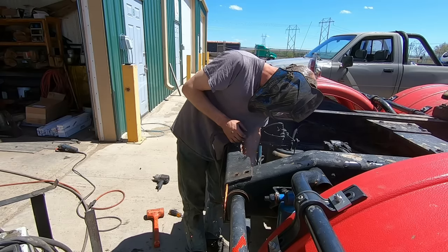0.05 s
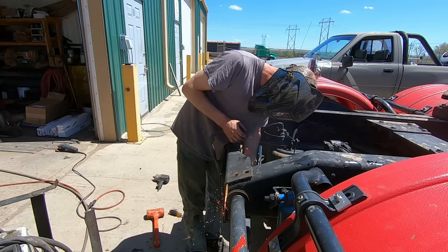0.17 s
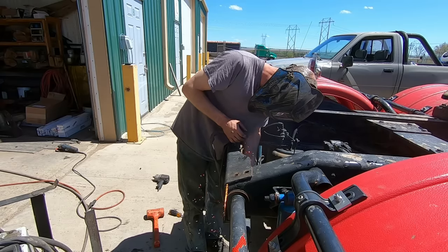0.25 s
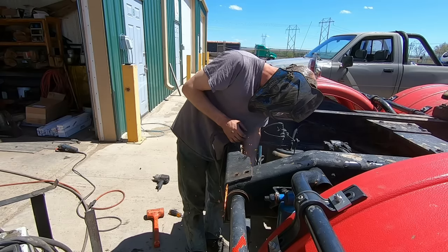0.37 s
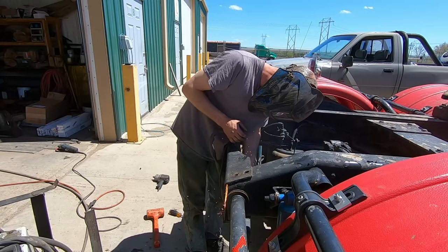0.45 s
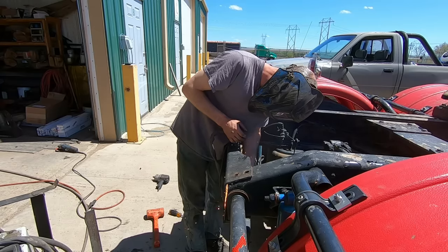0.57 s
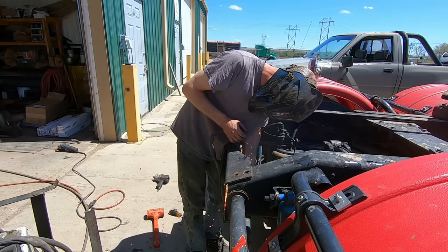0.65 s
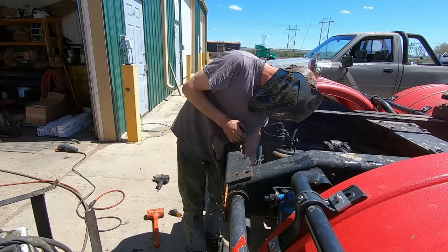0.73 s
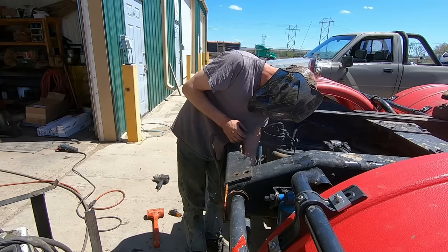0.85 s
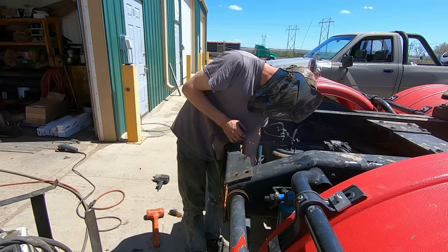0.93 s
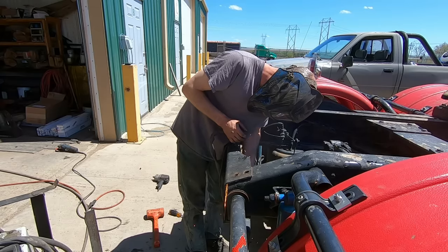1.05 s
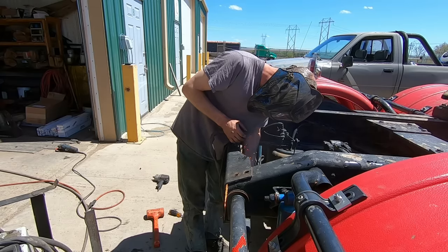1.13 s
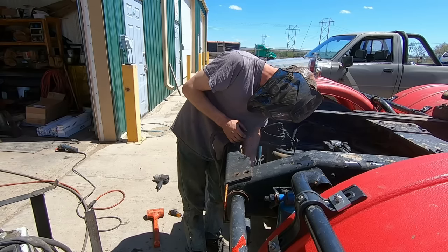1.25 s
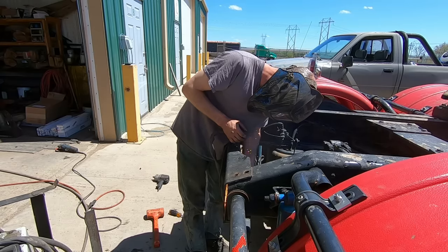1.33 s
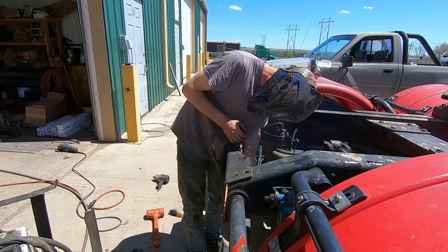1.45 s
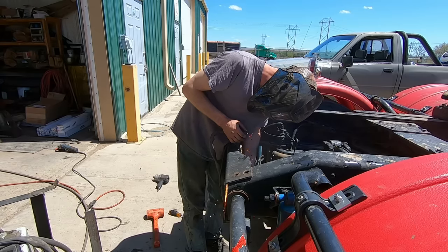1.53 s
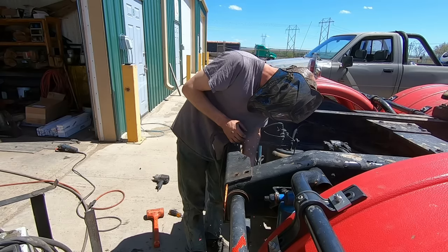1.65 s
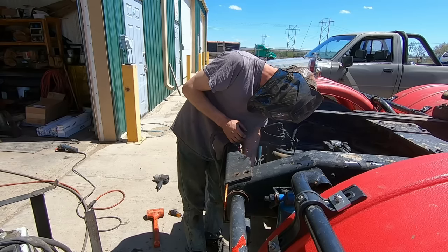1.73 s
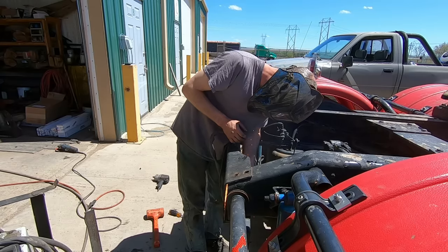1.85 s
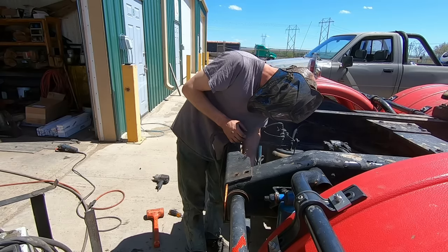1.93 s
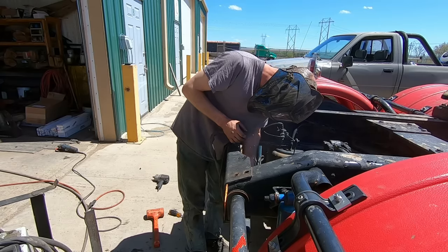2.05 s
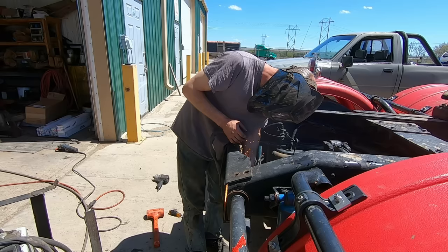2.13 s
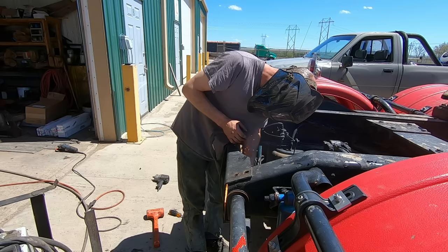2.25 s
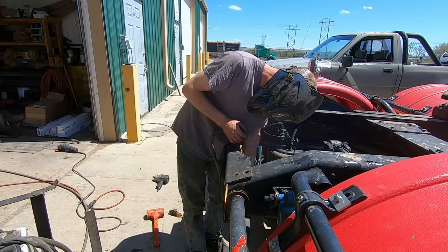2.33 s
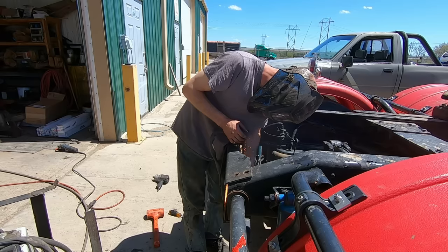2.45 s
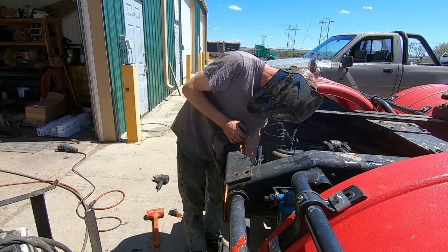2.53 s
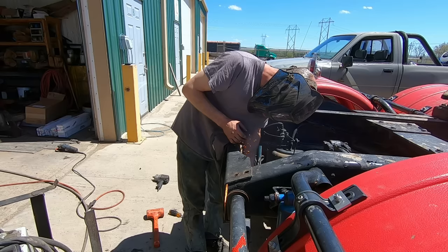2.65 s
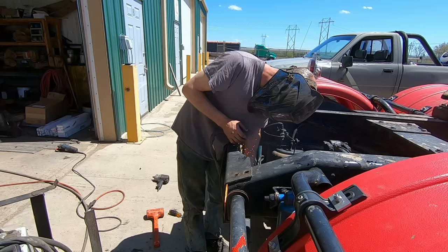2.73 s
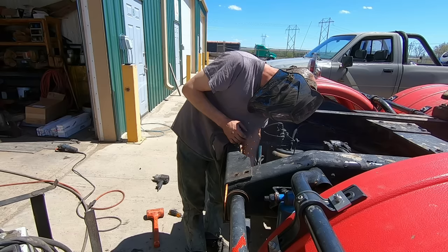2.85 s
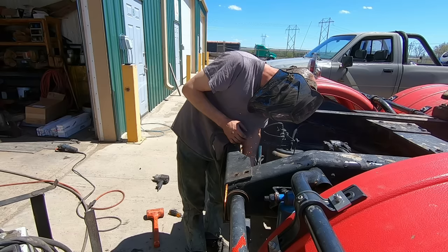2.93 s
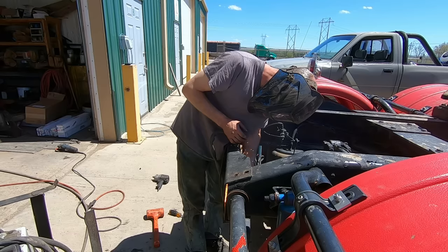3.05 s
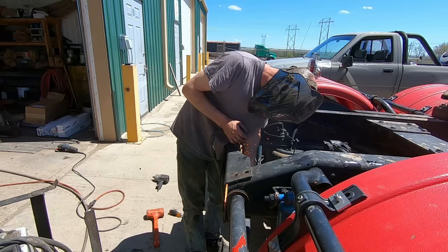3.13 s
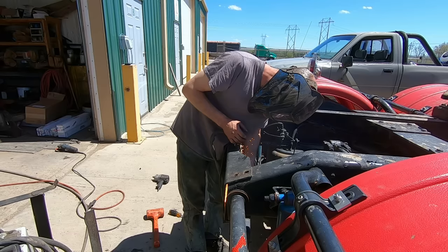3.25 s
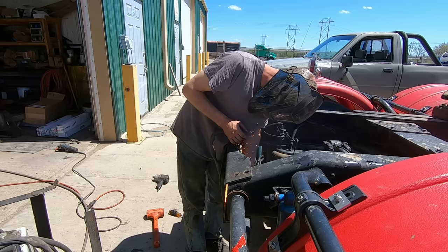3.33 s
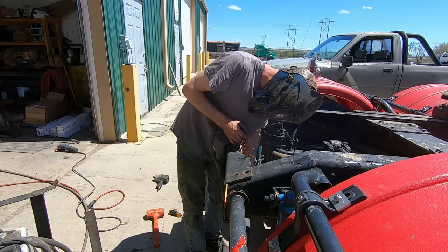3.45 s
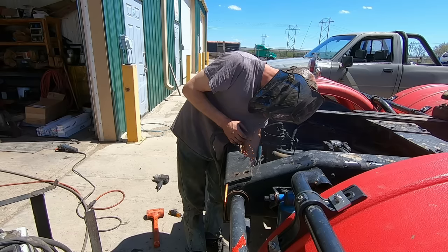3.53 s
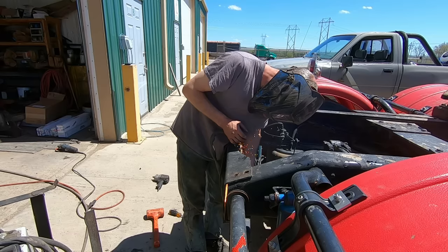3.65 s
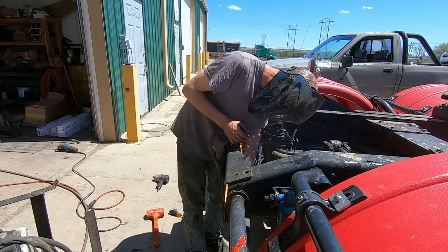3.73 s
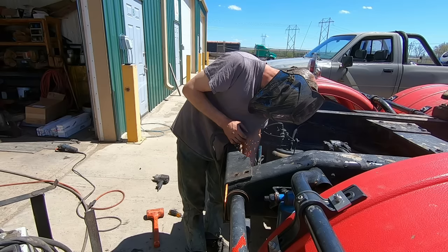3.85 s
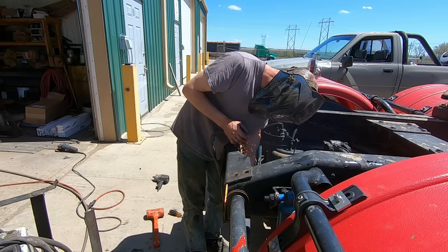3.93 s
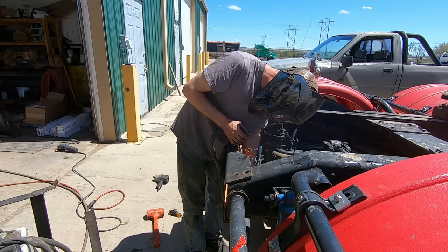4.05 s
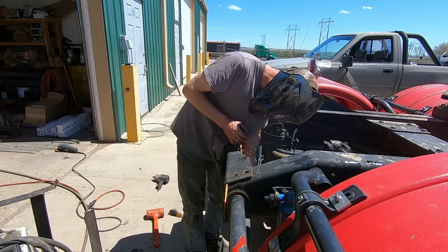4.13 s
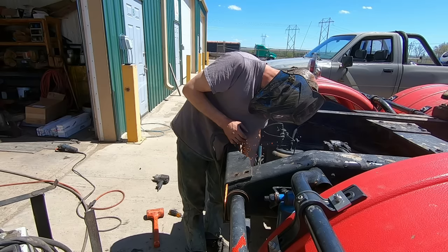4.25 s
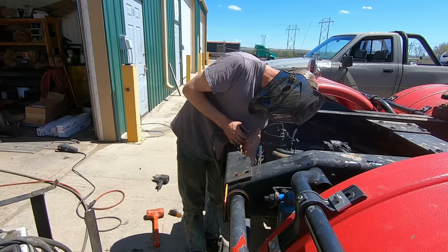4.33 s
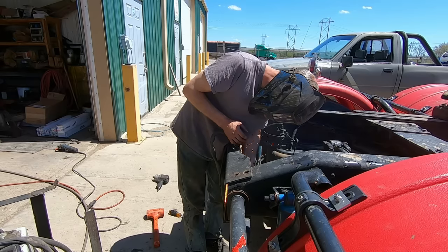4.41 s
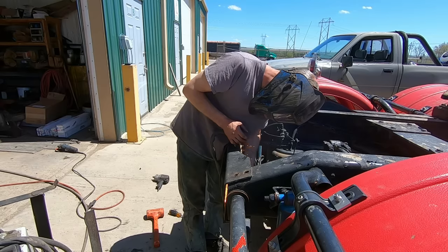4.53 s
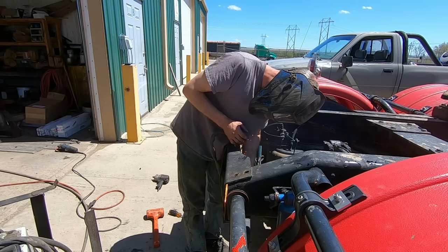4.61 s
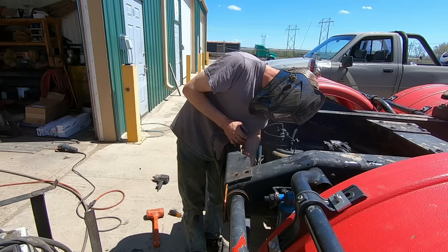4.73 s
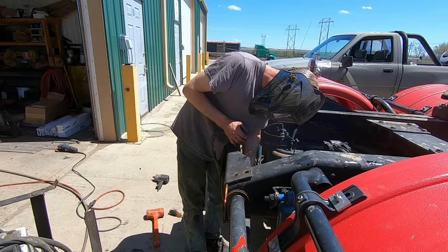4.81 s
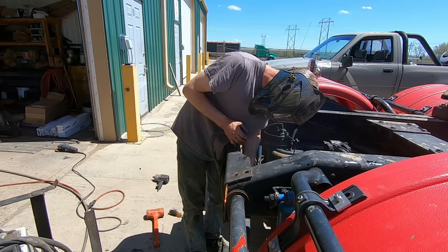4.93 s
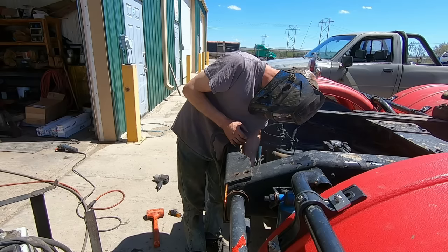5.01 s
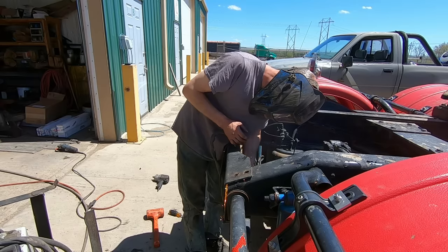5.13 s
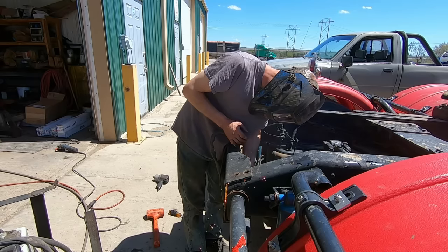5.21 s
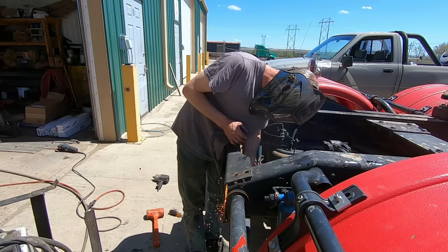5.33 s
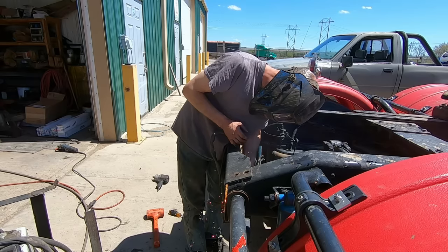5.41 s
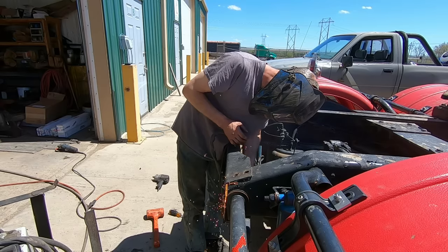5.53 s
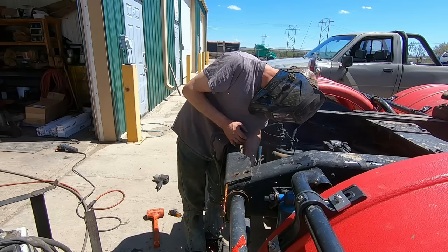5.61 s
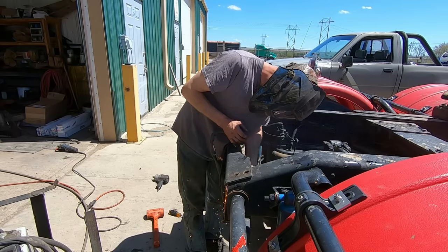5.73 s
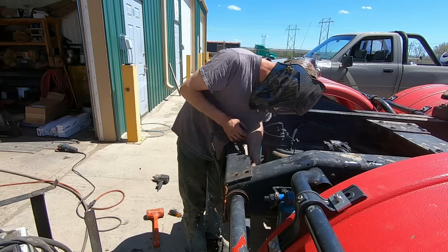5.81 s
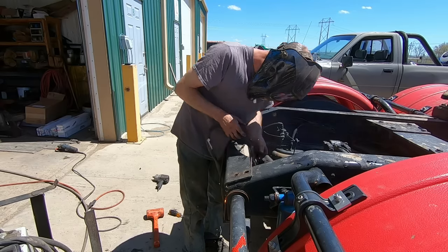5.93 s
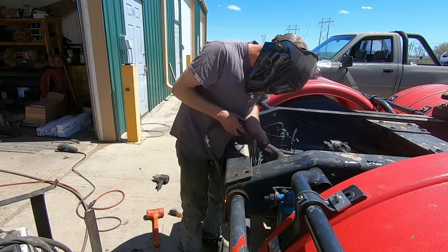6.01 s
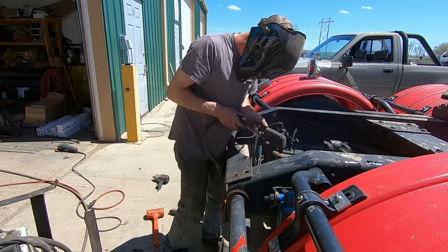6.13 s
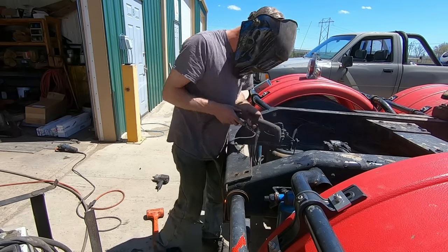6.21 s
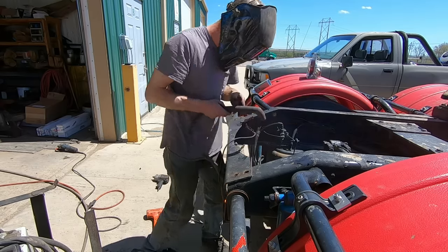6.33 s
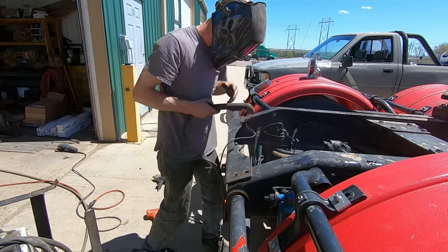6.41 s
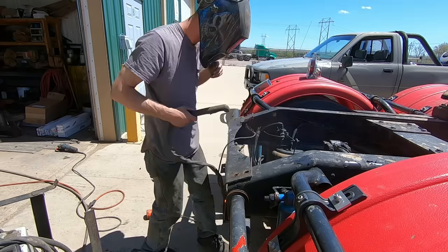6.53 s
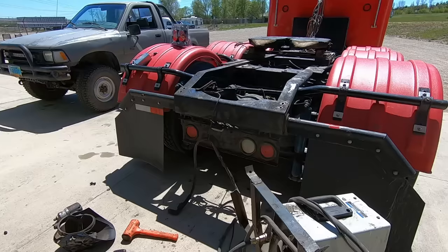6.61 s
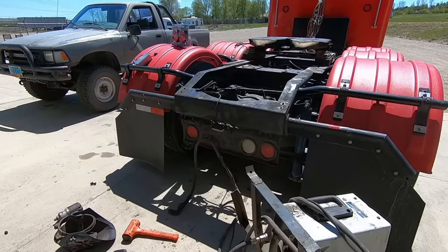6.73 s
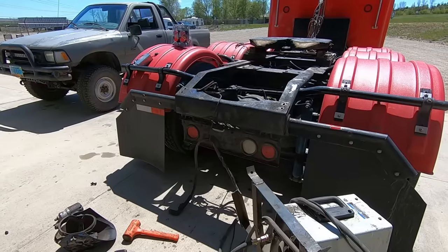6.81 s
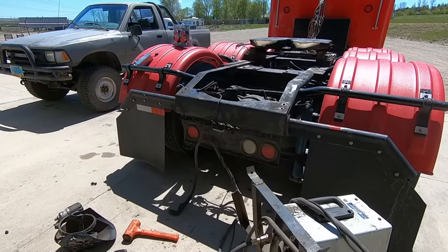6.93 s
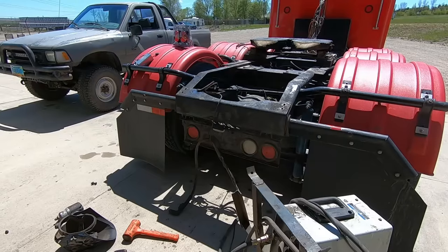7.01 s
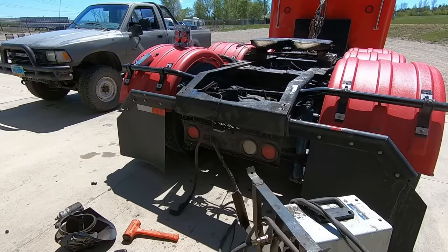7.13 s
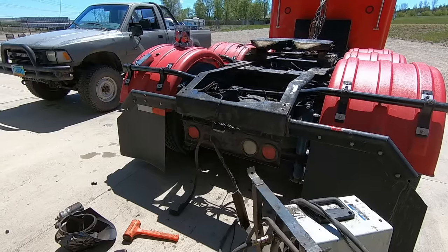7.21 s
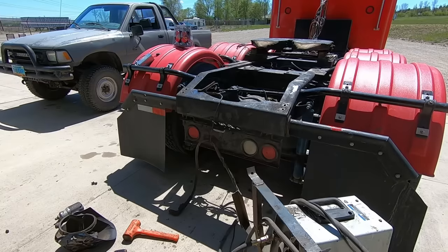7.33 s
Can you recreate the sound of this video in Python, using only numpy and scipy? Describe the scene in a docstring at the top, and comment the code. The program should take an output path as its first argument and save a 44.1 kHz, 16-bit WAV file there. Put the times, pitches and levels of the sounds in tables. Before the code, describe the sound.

Outside a workshop, a plasma torch cuts a steel truck frame with a loud, bright, slightly sputtering hiss over a low compressor hum. The arc pops off, leaving softer cooling air that grows as the torch lifts, with a fuzzy falling whistle. Everything cuts to brief silence, then low wind gusts buffet the microphone with tiny squeaks and a final scuff.

```python
"""A steady plasma-torch hiss cutting a steel truck frame, over an air compressor's hum: shaped noise and sine orders.
The arc goes out with a pop, a pressure swing plus a dull noise puff.
Cooling noise blows on, louder as the torch lifts, with a falling sine whistle of fuzzy amplitude and phase.
All sound stops briefly; then gusts of low noise buffet the microphone, with squeaks and a scuff of resonant noise."""
import sys
import numpy as np
from scipy.fft import rfft, irfft, next_fast_len
from scipy.io import wavfile
from scipy.ndimage import map_coordinates

SR = 44100
rng = np.random.default_rng(int(sys.argv[2]) if len(sys.argv) > 2 else 0)


def transcribe(u):
    """Save the signal u as a 16-bit wav file named by the first command-line argument.

    u: samples, shape (n,) or (channels, n), limited to [-1, 1]; the rate is SR.
    q: integer samples, one column per channel.
    """
    v = np.clip(np.atleast_2d(u).T, -1, 1)
    q = np.round(v * 32767).astype(np.int16)
    wavfile.write(sys.argv[1], SR, q)


N = 324558
TIME = np.arange(N) / SR

# Jet colour at the two microphone ports: f/Hz, left level/dB, right level/dB (relative)
JET_PORTS = [(391, -24, -26.5), (1035, -24, -21.5), (1340, -18, -14.5), (1697, -18.5, -17),
             (4260, -14.5, -12.5), (5120, -13.5, -9), (5760, -14, -8.5), (6620, -15, -1.5),
             (7310, -14.5, -1.7), (7830, -26, -7), (9000, -15.5, -12.5), (10160, -9, -6.5),
             (11830, -20.5, -18), (14960, -30.5, -31)]
# Jet likeness between the ports: f/Hz, correlation/1
PORT_LIKENESS = [(60, 0.74), (110, 0.88), (200, 0.87), (370, 0.93), (680, 0.76), (1250, 0.69), (2300, 0.97),
                 (4230, 1), (7760, 0.44), (14300, 0.7)]
# Phase by which the left port leads: f/Hz, phase/rad
LEFT_LEAD = [(300, -0.15), (850, -0.57), (1500, -0.036), (4000, -0.53), (6100, -1.06), (7500, -0.065),
             (8500, 1.6), (10000, -0.68), (13000, -0.25)]
# Frame-channel resonances: f/Hz, width/Hz, level/dB re direct jet, before channel_db
CHANNEL_MODES = [(548, 79, 1.5), (807, 43, 2), (929, 25, 2), (1351, 30, 0.5), (1469, 36, -0.5),
                 (1900, 25, -16), (1980, 140, -4), (2585, 23, -11.5), (3160, 24, -11.5), (3343, 43, -5.5),
                 (3965, 21, -7), (4870, 39, -1), (5280, 40, -11.5), (5580, 91, -5.5)]
# Borders between roar, rasp, hiss and sizzle: f/Hz
REGISTER_BORDERS_HZ = [2500, 5200, 8500]
# Roar, rasp, hiss, sizzle: level/dB before arc_db, tilt/(dB per dB of brightness), gain once cut is open/dB
JET_REGISTERS = [(-36, -.5, 1), (-33.5, -0.3, 4.5), (-22.5, -0.19, -.5), (-29.5, 1, -1)]
# Tilt towards sizzle as the torch moves: t/s, brightness/dB
BRIGHTNESS_CURVE = [(0, -1), (1.2, -2), (1.7, 1.5), (2.3, -0.1), (3.5, 2), (4.3, 3), (5.2, 0.9), (5.8, -3)]
# Narrow bands that swell and fade during the cutting: middle t/s, f/Hz, level/dB
KERF_BANDS = [(0.95, 3330, -41.5), (1.15, 5550, -39.5), (1.8, 7170, -36.5), (1.75, 8200, -41.5),
              (2.09, 5280, -42), (2.1, 7710, -39.5), (2.84, 6830, -36), (2.67, 4630, -42),
              (4.53, 5000, -38), (5.05, 6310, -38.5)]
# Cooling-air colour against the burning jet: f/Hz, level/dB
COOLING_COLOUR = [(400, -1.5), (1000, 2.5), (1700, -3), (2600, -6.5), (3500, -10), (4500, -13.5),
                  (7000, -11.5), (10000, -16.5), (14000, -15)]
# Compressor orders: multiple of turn rate/1, mean relative level/dB
PUMP_ORDERS = [(4, -9), (9, 0), (10, -1), (11, -18), (12, -7.5), (16, -11), (18, -16), (20, -16)]
# Compressor hum: t/s, level/dB before pump_db
PUMP_LEVEL_CURVE = [(0.0, -40), (0.4, -39), (1.7, -43.5), (3.0, -42.5), (4.3, -48.5), (4.7, -42.5),
                    (6.0, -45.5), (6.3, -37.5), (6.63, -37.5)]
# Steady motor: f/Hz, mean level/dB
MOTOR_LINES = [(32.6, -57.5), (65.1, -53)]
# Relative noise spectra: f/Hz, level/dB
YARD_SPECTRUM = [(15, -26.5), (35, -3.5), (70, 0.5), (110, 2.5), (190, -4), (260, -5), (330, -9),
                 (380, -15), (600, -17), (1500, -39.5)]
BUFFET_SPECTRUM = [(12, -23), (25, 3), (70, 3), (120, 1), (220, -1.5), (340, -24), (500, -21), (1000, -74)]
FLUTTER_SPECTRUM = [(150, -3), (270, 4.5), (400, -3), (700, -12.5), (1300, -25), (2500, -58)]
BREEZE_SPECTRUM = [(300, 6.5), (1000, 5.5), (2000, -1), (3500, -2.5), (5000, -18), (7000, -24), (9000, -37),
                   (11000, -72)]
PUFF_SPECTRUM = [(60, -10), (280, -1.5), (550, -6.5), (1000, -8), (3000, -18), (8000, -47.5)]
HOLLOW_SPECTRUM = [(400, -14.5), (800, -7.0), (1100, -1.5), (1350, -3.0), (1600, -15), (3000, -45)]
# Gust peaks: full force t/s, hold/s, level/dB before buffet_db
GUST_PEAKS = [(6.931, .012, -20.5), (6.968, 0.028, -22), (7.053, 0.022, -19.5)]
# Handling noises: middle t/s, Gaussian sigma/s, f/Hz, width/octave, level/dB
HANDLING_NOISES = [(6.854, 0.0011, 3100, 0.27, -50), (6.856, 0.0033, 2320, .09, -50),
                   (6.874, .004, 2500, .15, -45.5), (6.885, .003, 2740, .09, -41),
                   (6.884, 0.0013, 3350, 0.27, -42.5), (6.965, .003, 1400, .25, -39),
                   (6.992, .003, 2000, .1, -42), (7.351, 0.013, 2730, 0.44, -34)]

# *_AT_S is the middle of a linear ramp, *_TAKES_S its full length
ARC_OFF_AT_S = 5.806
OPEN_AT_S, OPEN_TAKES_S = 4.57, 1.7  # the cut opens through the steel
KERF_SIGMA_S = .42
BLAST_DB, BLEED_AT_S, BLEED_TAKES_S = -10.5, 5.94, 0.097  # last blast, re arc
AIR_DB = -37.5  # before the lift
LIFT_AT_S, LIFT_TAKES_S, LIFT_DB = 6.33, 0.34, 4  # torch leaves the frame
PUMP_HZ = 12.55  # mean turn rate
RUMBLE_DB, RUMBLE_FOLLOWS = -45.5, .25  # mean level; share of the hum's swells in dB
WHISTLE_FROM_S, WHISTLE_HZ, SETTLES_HZ, SAG_TAU_S = 6.18, 1298, 1140, .53
WHISTLE_DB, WHISTLE_AT_S, WHISTLE_TAKES_S = -39, 6.27, .15
HUSH_FROM_S, HUSH_TO_S = 6.640, 6.838
GUST_RISE_DB_PER_S, GUST_FALL_DB_PER_S = 327, 450
WAKE_DB, WAKE_FALL_DB_PER_S = -3, 67  # re its gust
FLUTTER_DB_PER_DB = 1.63  # flutter per dB of gust force
TOP_HZ = 14620


def amp(db):
    """Decibels to gain."""
    return 10 ** (np.asarray(db) / 20)


def unit(x):
    """Scale to rms 1."""
    return x / np.sqrt(np.mean(x ** 2) + 1e-20)


def along(points, f, axis=1):
    """One column of (Hz, values) points, interpolated over log frequency."""
    table = np.transpose(points)
    return np.interp(np.log(f + 1), np.log(table[0] + 1), table[axis])


def curves(rows):
    """One value per sample for each column after the time."""
    s, *cols = np.transpose(rows)
    return [np.interp(TIME, s, c) for c in cols]


def wobble(rate_hz):
    """Smooth random curve with rate_hz knots a second."""
    knots = rng.standard_normal(int(N * rate_hz / SR) + 4)
    return map_coordinates(knots, [TIME * rate_hz])


def after(middle_s, rise_s):
    """Linear 0-to-1 ramp centred on middle_s."""
    return np.clip((TIME - middle_s) / rise_s + .5, 0, 1)


def filtered(x, response):
    """Apply a complex response of frequency to x."""
    m = next_fast_len(N + 8192)
    return irfft(rfft(x, m) * response(np.fft.rfftfreq(m, 1 / SR)), m)[..., :N]


def noise(spectrum, side_db):
    """Coloured stereo noise of rms 1, with a quieter side signal and a rolloff about the last point."""
    top_hz = spectrum[-1][0]
    colour = lambda f: amp(along(spectrum, f)) / (1 + (f / top_hz) ** 2)
    mid, side = filtered(rng.standard_normal((2, N)), colour)
    side = amp(side_db) * side
    return unit(np.array([mid + side, mid - side]))


def scatter(x, share, longest_s, drift_s, count):
    """Echoes off nearby steel; delays creep as the hand moves."""
    out = x.copy()
    for place, sign in zip(rng.random(count), rng.choice([-1, 1], count)):
        knots = rng.standard_normal(8)
        drift = drift_s * np.interp(TIME, np.linspace(0, N / SR, len(knots)), knots)
        delay_s = .0012 + longest_s * place ** 2 + drift
        source = (np.arange(N) - np.round(delay_s * SR).astype(int)) % N
        out += sign * share / np.sqrt(count) * x[source]
    return out


def ports(f):
    """Gain and phase of the left and right ports towards the torch."""
    gain = amp([along(JET_PORTS, f, axis=1), along(JET_PORTS, f, axis=2)])
    return gain * np.exp(.5j * np.outer([1, -1], along(LEFT_LEAD, f)))


def jet_noise(echo_share, channel_db):
    """Turbulent air, direct and diffuse, coloured by the frame channel and the two ports."""
    direct = scatter(rng.standard_normal(N), echo_share, longest_s=.013, drift_s=.00003, count=18)
    diffuse = scatter(rng.standard_normal(N), echo_share, longest_s=.013, drift_s=.00005, count=6)

    def spread(f):
        angle = np.arccos(np.clip(along(PORT_LIKENESS, f), 0, 1)) / 2
        return np.array([np.cos(angle), np.sin(angle)])

    def channel(f):
        modes = [amp(db + channel_db) * 1j * f * w / (c * c - f * f + 1j * f * w) for c, w, db in CHANNEL_MODES]
        return 1 + sum(modes)

    mid, side = filtered(np.array([direct, diffuse]), spread)
    pair = np.array([mid + side, mid - side])
    return filtered(pair, lambda f: channel(f) * ports(f) * f / np.hypot(f, 250))


def cutting_jet(jet):
    """Roar and rasp trade against sizzle with brightness; each register shifts level as the cut opens."""
    lows = [filtered(jet, lambda f: 1 / (1 + (f / hz) ** 14)) for hz in REGISTER_BORDERS_HZ]
    bands = np.diff([0 * jet, *lows, jet], axis=0)
    bright_db, = curves(BRIGHTNESS_CURVE)
    opened = after(OPEN_AT_S, OPEN_TAKES_S)
    out = 0
    for band, (db, tilt, open_db) in zip(bands, JET_REGISTERS):
        out = out + unit(band) * amp(db + tilt * bright_db + open_db * opened)
    return out


def kerf(width_hz=42):
    """The jet sings in the gap it has cut: narrow noise bands swell and fade."""
    out = np.zeros((2, N))
    for s, hz, db in KERF_BANDS:
        band = unit(filtered(rng.standard_normal(N), lambda f: np.exp(-((f - hz) / width_hz) ** 2 / 2)))
        sides = np.abs(ports(np.array([hz])))
        swell = np.exp(-((TIME - s) / KERF_SIGMA_S) ** 2 / 2)
        out += amp(db) * sides / sides.mean() * band * swell
    return out


def torch(arc_db=-.5, drop_db=-4, fade_tau_s=0.035, sputter_db=-0.22, flicker_db=0.2, surge_db=0.53):
    """The burning jet sputters against the frame and dies away; softer cooling air blows on."""
    out = after(ARC_OFF_AT_S, 0.006)
    dying = amp(drop_db) * np.exp(-np.maximum(TIME - ARC_OFF_AT_S, 0) / fade_tau_s)
    burning = 1 - out + out * dying
    arc = amp(arc_db) * cutting_jet(jet_noise(echo_share=0.55, channel_db=0)) + kerf()
    free_jet = filtered(jet_noise(echo_share=.22, channel_db=-16), lambda f: amp(along(COOLING_COLOUR, f)))
    air = amp(AIR_DB + LIFT_DB * after(LIFT_AT_S, LIFT_TAKES_S)) * unit(free_jet)
    # air hisses through the cut until the pressure bleeds off
    blast = amp(BLAST_DB) * out * (1 - after(BLEED_AT_S, BLEED_TAKES_S))
    # turbulence at three speeds
    unrest = amp(sputter_db * wobble(700) + flicker_db * wobble(110) + surge_db * wobble(28))
    return (np.maximum(burning, blast) * arc + out * air) * unrest


def tone_line(cycles, db):
    """Sine at random phase whose level wanders about db rms."""
    return np.sqrt(2) * amp(db + 1.5 * wobble(3)) * np.sin(2 * np.pi * (cycles + rng.random()))


def compressor(pump_db=-2):
    """Pump orders sound together over a motor drone and the yard's rumble."""
    level_db, = curves(PUMP_LEVEL_CURVE)
    yard_db = RUMBLE_DB + RUMBLE_FOLLOWS * (level_db - level_db.mean())
    turns = np.cumsum(PUMP_HZ * (1 + 0.0013 * wobble(2))) / SR
    pump = unit(sum(tone_line(k * turns, db) for k, db in PUMP_ORDERS))
    motor = sum(tone_line(hz * TIME, db) for hz, db in MOTOR_LINES)
    yard = amp(yard_db) * noise(YARD_SPECTRUM, side_db=-11)
    return amp(level_db + pump_db) * pump + motor + yard


def arc_pop(push_hz=200, puff_db=-31, decay_tau_s=0.028):
    """The collapsing arc gives one swing of pressure and a short dull puff."""
    t = TIME - 5.8025
    push = amp(-17.5) * np.sin(2 * np.pi * push_hz * t) * np.exp(-(t / .0016) ** 2 / 2)
    puff = noise(PUFF_SPECTRUM, side_db=-17.5) * after(5.8, 0.0018) * np.exp(-np.abs(t) / decay_tau_s)
    return push + amp(puff_db) * puff


def nozzle(breathy_db=-44, rough=0.25):
    """Cooling air rushes hollowly over the nozzle, then locks into a fuzzy falling whistle."""
    sag = np.exp(-np.maximum(TIME - WHISTLE_FROM_S, 0) / SAG_TAU_S)
    hz = SETTLES_HZ + (WHISTLE_HZ - SETTLES_HZ) * sag
    fuzz = 1 + rough * (wobble(150) + 1j * wobble(150))
    tone = unit(np.real(fuzz * np.exp(2j * np.pi * np.cumsum(hz) / SR)))
    whistle = amp(WHISTLE_DB) * tone * after(WHISTLE_AT_S, WHISTLE_TAKES_S)
    hollow = noise(HOLLOW_SPECTRUM, side_db=-11)
    return whistle + amp(breathy_db) * hollow * after(ARC_OFF_AT_S, .03)


def gust_force(s, hold_s):
    """One gust in dB re peak: it rises, holds, drops, and leaves a slowly dying wake of weaker eddies."""
    early = np.maximum(s - TIME, 0)
    late = np.maximum(TIME - s - hold_s, 0)
    fall_db = np.maximum(-GUST_FALL_DB_PER_S * late, WAKE_DB - WAKE_FALL_DB_PER_S * late)
    return fall_db - GUST_RISE_DB_PER_S * early


def gust(buffet_db=1, flutter_db=-25, breeze_db=-45):
    """Eddies thump on the microphone over a soft open-air rush; the strongest flutter higher up."""
    force_db = np.max([db + gust_force(s, hold_s) for s, hold_s, db in GUST_PEAKS], axis=0)
    eddies = wobble(55)
    buffet = amp(force_db + buffet_db + .5 * eddies) * noise(BUFFET_SPECTRUM, side_db=-63)
    flutter_level_db = FLUTTER_DB_PER_DB * (force_db - force_db.max()) + flutter_db + 1.7 * eddies
    flutter = amp(flutter_level_db) * noise(FLUTTER_SPECTRUM, side_db=-60)
    breeze = amp(breeze_db) * noise(BREEZE_SPECTRUM, side_db=-46) * after(6.86, 0.066)
    return buffet + flutter + breeze


def scuffs():
    """Short squeaks and a scuff: swells of noise in one resonance each."""
    out = np.zeros(N)
    for s, sigma_s, hz, octaves, db in HANDLING_NOISES:
        resonance = lambda f: 1 / (1 + (np.log2((f + 1) / hz) / octaves) ** 2 / 2) ** 2
        rub = unit(filtered(rng.standard_normal(N), resonance))
        out += amp(db) * rub * np.exp(-.5 * ((TIME - s) / sigma_s) ** 2)
    return out


def scene():
    """The cutting, a brief silence, then the windy yard."""
    cutting = torch() + compressor() + arc_pop() + nozzle()
    windy_yard = gust() + scuffs()
    return cutting * (1 - after(HUSH_FROM_S, 0.0099)) + windy_yard * after(HUSH_TO_S, 0.013)


def record(dry):
    """Band limit: gain falls linearly to zero over the 400 Hz below TOP_HZ."""
    return filtered(dry, lambda f: np.clip((TOP_HZ - f) / 400, 0, 1))


dry = scene()
out = record(dry)
transcribe(out)
```